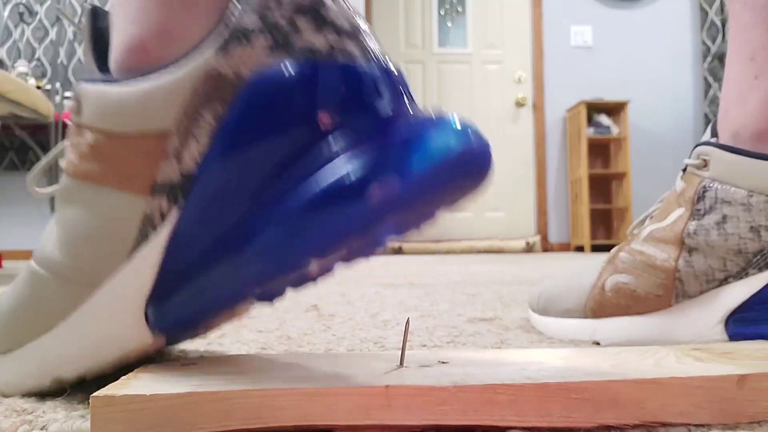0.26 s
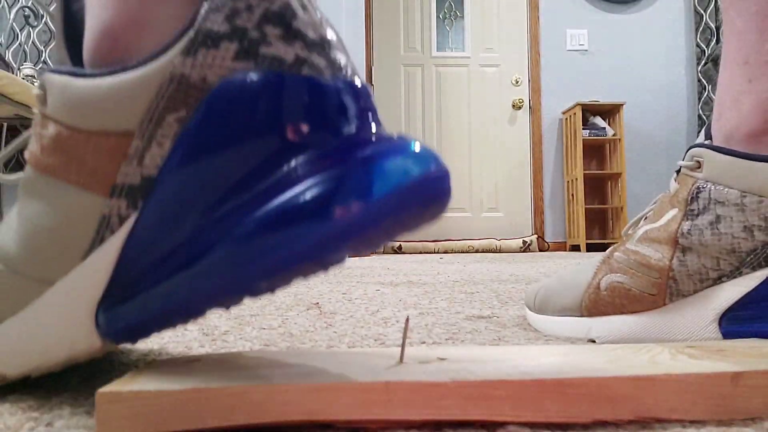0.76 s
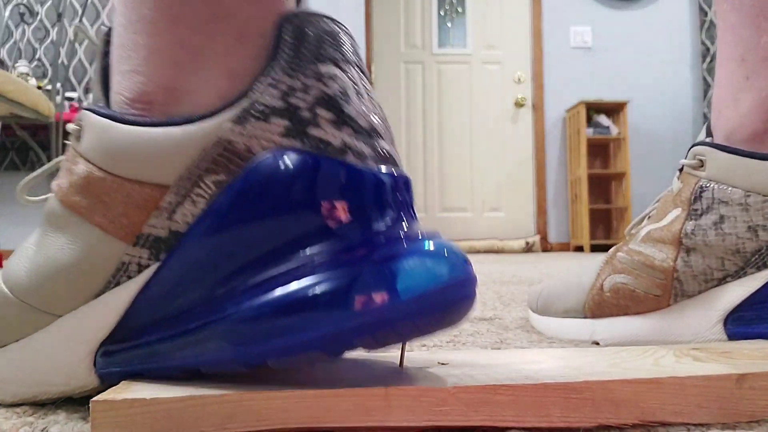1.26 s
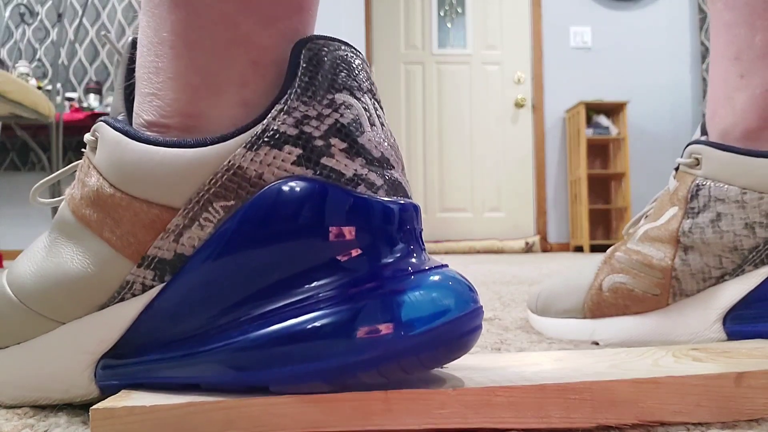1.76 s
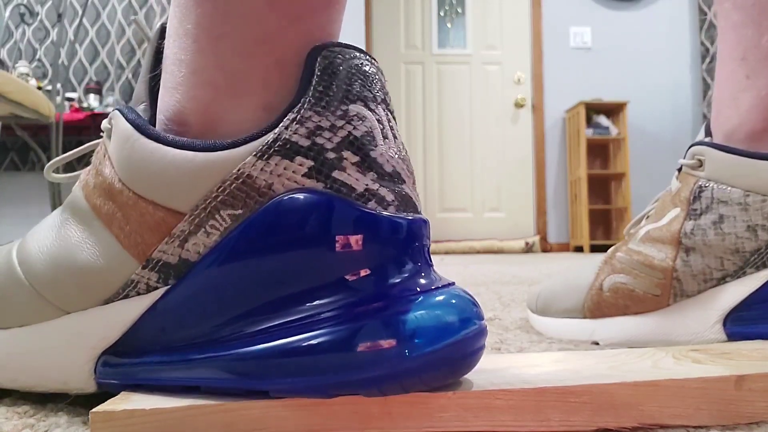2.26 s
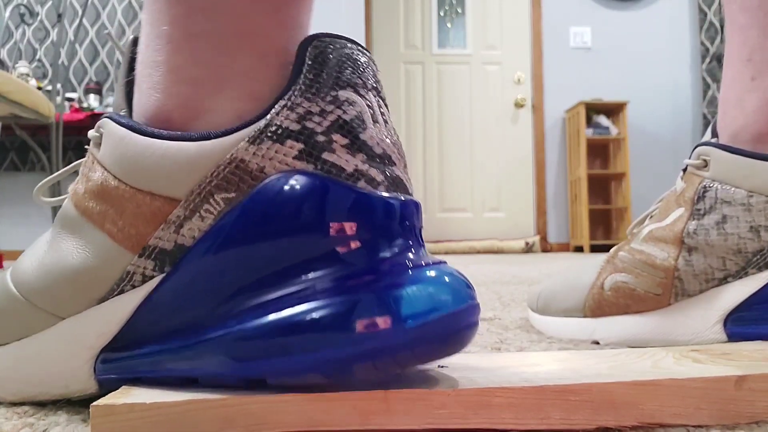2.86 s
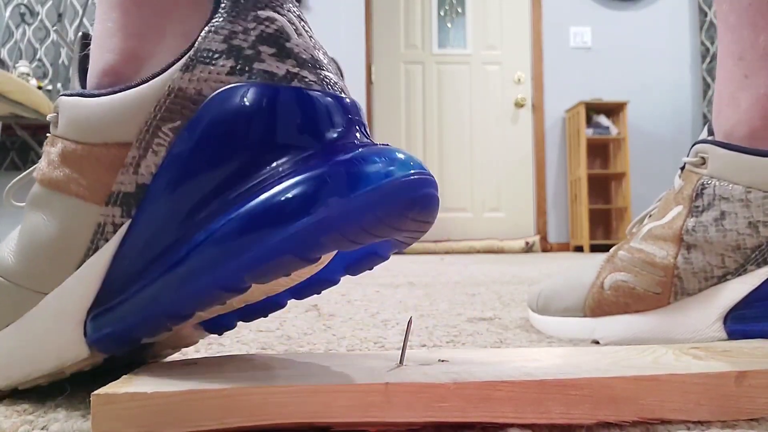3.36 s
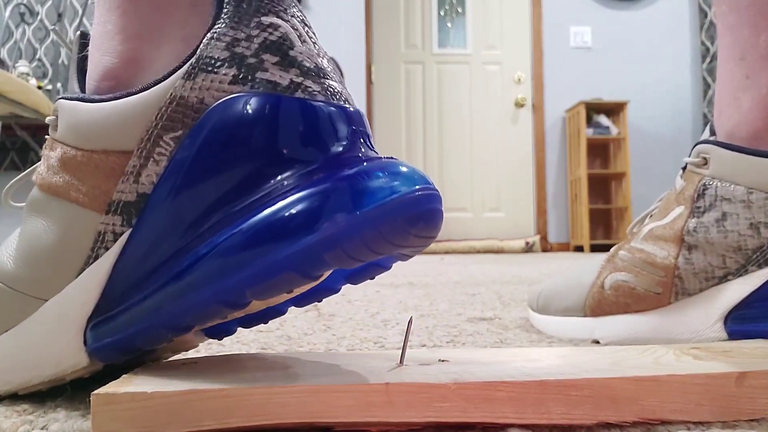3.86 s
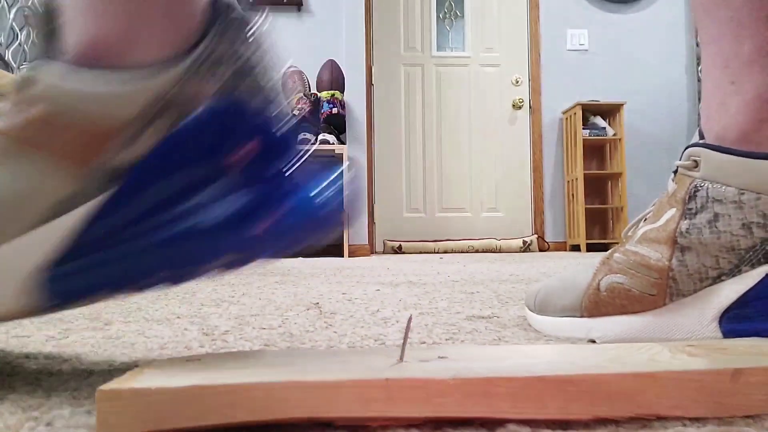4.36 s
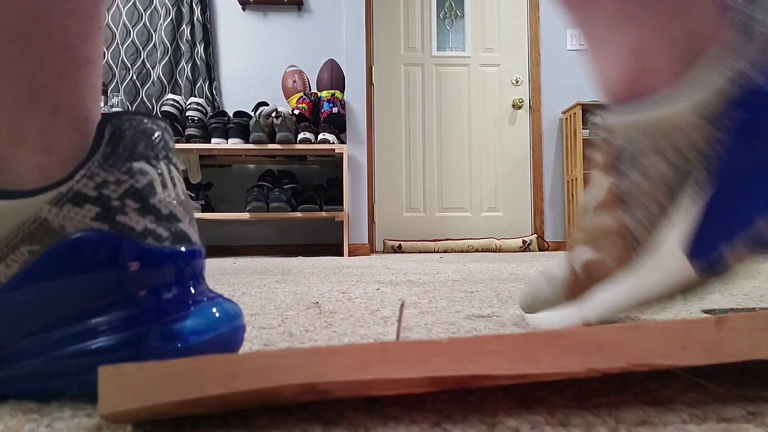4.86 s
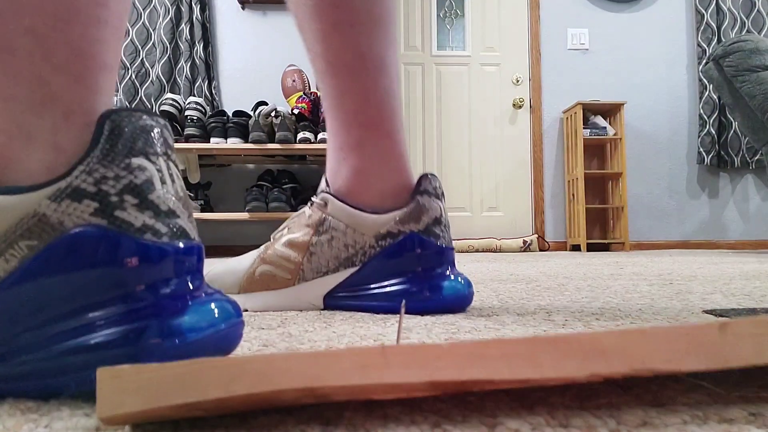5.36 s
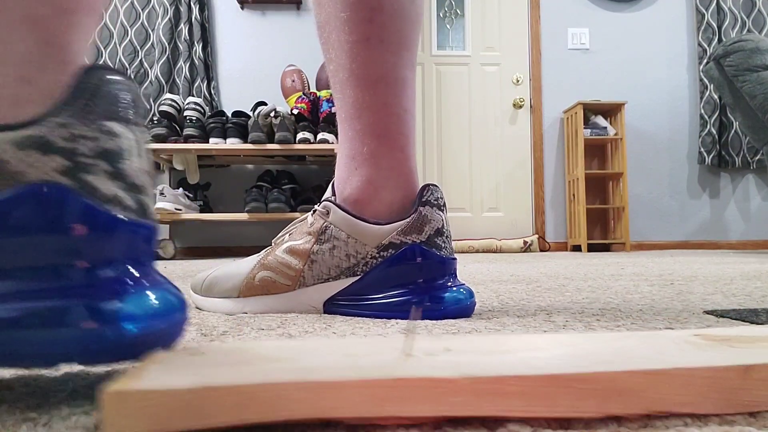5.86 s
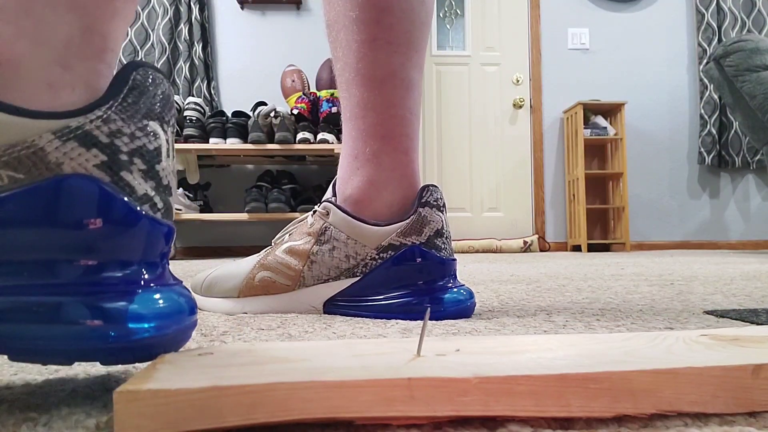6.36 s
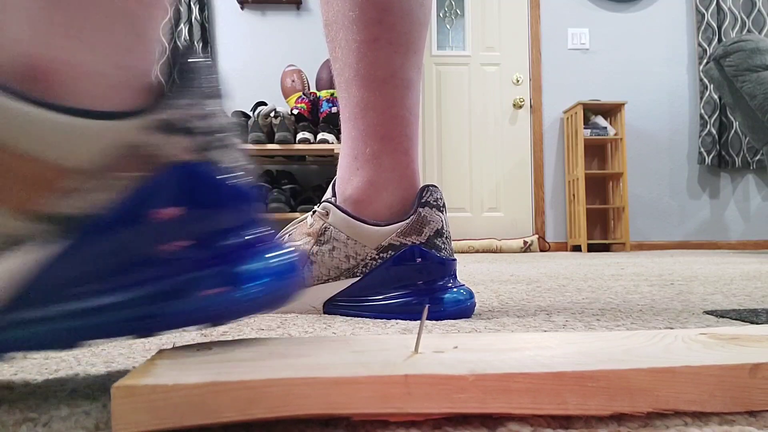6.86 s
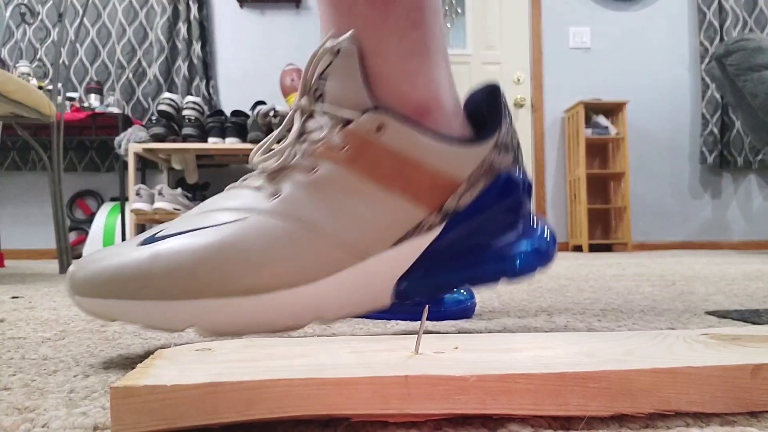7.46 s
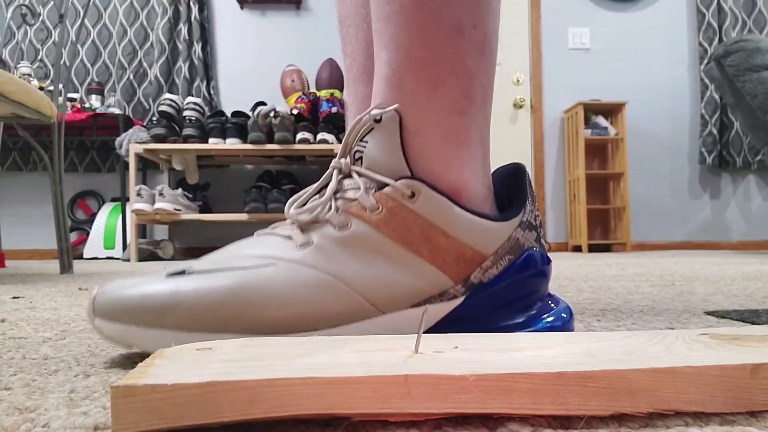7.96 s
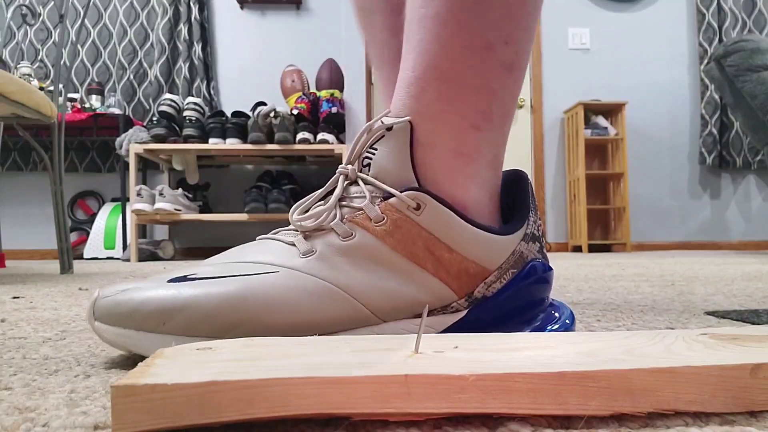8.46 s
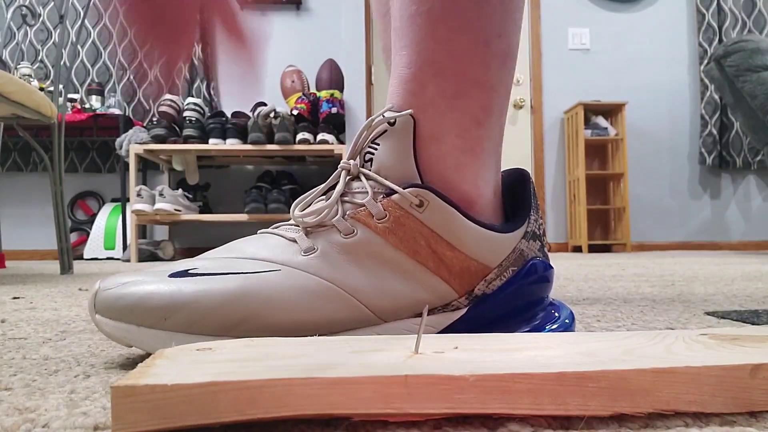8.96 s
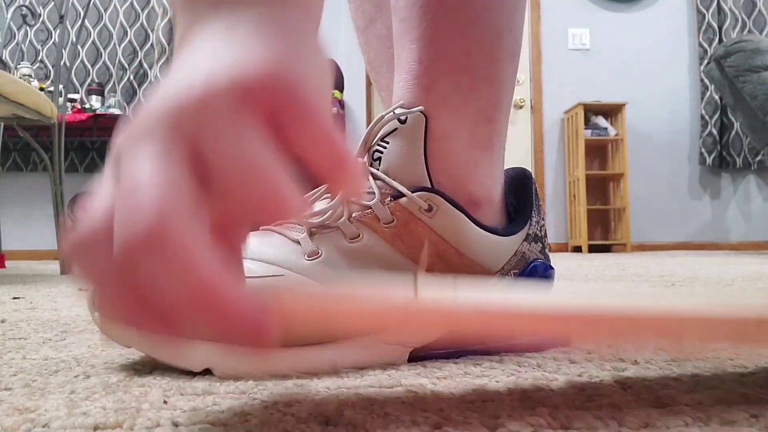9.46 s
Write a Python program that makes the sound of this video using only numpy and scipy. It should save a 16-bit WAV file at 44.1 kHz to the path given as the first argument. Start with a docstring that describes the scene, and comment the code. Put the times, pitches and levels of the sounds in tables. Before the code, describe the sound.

Quiet, dry indoor foley: muffled footfalls and rubbing carpet fibres, mostly to the left. A nail pops into a rubbery cushion with a hollow click, later snaps twice on release, and dull wooden knocks accompany the steps. Near the end one loud, bright wooden knock stands far above the rest, followed by tearing fibre ticks and a dull bump. The short room reflections fade over rumble and soft hiss.

```python
"""Sneakers tread on a nailed wooden board lying on carpet, close to a microphone on the floor of a small room.
The board knocks with damped wood modes; the nail pops into the heel's air cushion and snaps out, as ticks and rings.
Fibres tear off with small ticks, shoes thud as slow low modes, scuff as crackling grains and squeak as hissy noise.
At last a hand knocks the board and drags it off the carpet. The room answers with decaying noise; behind it all
lie lumpy floor rumble, a faint steady hiss and a high hiss that swells before and around the hits."""
import sys
import numpy as np
from scipy import signal
from scipy.fft import rfft, irfft
from scipy.io import wavfile
from scipy.ndimage import uniform_filter1d

SR = 44100
rng = np.random.default_rng(int(sys.argv[2]) if len(sys.argv) > 2 else 0)


def bounce(signal):
    """Save signal as a 16-bit WAV file at the path given by the first command-line argument."""
    frames = np.transpose(np.atleast_2d(signal))
    limited = np.clip(frames, -1, 1)
    pcm = np.round(limited * 32767).astype(np.int16)
    wavfile.write(sys.argv[1], SR, pcm)


N = 428652

# Event levels below are set ahead of panning, microphone ports and room.
# Wooden knocks. Each row: start in seconds, peak in dB, contact hardness in Hz, left over right in dB.
KNOCKS = [(2.185, -28, 300, 6.5), (3.1035, -32, 983, 5.5), (4.369, -45.5, 698, 10), (4.728, -29, 382, 10.5),
          (4.857, -32, 503, 6), (5.2228, -34.5, 624, -0.5), (5.458, -43.5, 800, 9.5),
          (5.491, -41.5, 714, 13), (5.5736, -28.5, 630, -2.5), (5.598, -27, 400, -1),
          (5.684, -35.5, 852, 13), (5.8924, -32, 634, 4.5), (5.9901, -37, 625, -2.5),
          (8.0403, -28, 616, 6.5), (8.736, -32.5, 594, -1.5), (8.9505, -34.5, 656, 2),
          (9.163, -34, 730, -2), (9.2013, -5, 1550, 8.5), (9.466, -37, 900, 3), (9.4753, -25.5, 624, 3),
          (9.614, -44.5, 860, -5)]
# Modes of the board on carpet. Each row: pitch in Hz, relative level in dB, time to fall 60 dB in seconds.
BOARD_MODES = [(182.1, -19, 0.047), (301, -21, 0.063), (454.3, -23.5, 0.025), (652, -14.5, 0.025),
               (960, -25, 0.0097), (1630, -7, 0.0098), (2512, -21.5, 0.013)]
# Snaps of nail, rubber and wood. Each row: start in seconds, ring peak in dB, ring pitch in Hz,
# ring time to fall 60 dB in seconds, relative overtones in dB, tick peak in dB, extra send to the room in dB.
SNAPS = [(0.3161, -46, 1620, 0.0017, -12.5, -43.5, 9), (0.4941, -48.5, 1040, .009, -10.5, -66, 0),
         (2.1805, -11.5, 952, .009, 1, -15.5, 1.5), (3.0602, -44, 818, 0.0092, -8, -49, 5),
         (3.1029, -29, 1580, 0.0057, -13, -24, 0), (4.6172, -48, 1950, .006, -22, -72, 9),
         (4.8565, -22.5, 1635, .013, 5.5, -11, -0.5), (6.3306, -54, 937, 0.03, 3, -44, 10.5),
         (6.367, -58, 930, .01, -1, -69, 6), (6.409, -62, 1004, .01, 6, -71, 4),
         (6.7888, -51, 1040, 0.022, -9, -41, 10.5), (8.834, -59, 3417, 0.0033, -25, -72.5, 7.5),
         (9.2019, -15.5, 2400, 0.0031, -16, -18, -2), (9.2018, -16, 1136, 0.0062, -11, -24, 2.5)]
# What a snap rings with. Each row: multiple of its ring pitch, relative level in dB, share of its ring time.
SNAP_MODES = [(1, 3.5, 1), (1.42, -4, 0.96), (1.89, -2, 1), (3.08, -17, .7)]
# Noisy crack of a snap. Each row: multiple of its ring pitch, relative level in dB per Hz.
CRACK_SPECTRUM = [(.1, -14), (.4, 1), (1, -2.5), (1.6, -7.5), (3.503, -14), (7.997, -27.5)]
# Tearing tick of a snap. Each row: frequency in Hz, relative level in dB per Hz.
SNAP_TICK_SPECTRUM = [(500, -27.5), (1200, -24), (3200, 1), (4200, -14.5), (5500, -6.5), (7500, -12.5),
                      (9500, -2.5), (12500, -1), (15000, 2)]
PUSH_PITCH, PUSH_DB = .215, -13.5  # low push of a snap: share of the ring pitch, level against the ring
# Carpet fibres snag on rough wood and tear free. Each row: start in seconds, tick peak in dB, left over right in dB.
SNAGS = [(3.075, -30, 8), (4.846, -31, 6), (5.5425, -44, 8), (5.586, -25.5, 5), (5.598, -27, 10),
         (5.6111, -27, -3), (5.6308, -42, 3.5), (9.3249, -37, -1), (9.4601, -35, 5), (9.466, -35, -14),
         (9.4763, -20, 4), (9.4822, -13.5, -3), (9.493, -15.5, 7), (9.5143, -16, -3)]
# Tearing tick of a snag. Each row: frequency in Hz, relative level in dB per Hz.
SNAG_TICK_SPECTRUM = [(500, -18), (2000, -3), (4000, -8), (6000, -7.5), (8000, -9.5), (11000, -5),
                      (13000, 5), (15000, 5)]
# Each snag plucks the board faintly: the ring level is against the tick.
SNAG_HZ, SNAG_T60_S, SNAG_RING_DB, SNAG_OVERTONES_DB = 780, 0.0058, -14, -15.5
# Soft footfalls that shake the floor. Each row: start in seconds, peak in dB, pitch in Hz, left over right in dB.
THUDS = [(0.364, -49, 68, 0), (0.472, -38, 110.4, 10), (0.492, -31.5, 79.6, 12), (1.025, -44, 135, 3),
         (1.362, -53, 116, 8), (2.188, -28.5, 158.6, 8), (2.19, -40.5, 72.8, -1.5), (3.09, -41, 102, 4.5),
         (4.373, -43, 79.65, 7.5), (4.726, -33, 116, 4), (5.333, -49.5, 69.8, 0), (5.58, -25.5, 82.5, -8),
         (5.677, -40, 63, -2.5), (5.927, -36, 71, 0), (6.807, -41, 61.9, -2), (6.812, -44.5, 116.6, 2.5),
         (8.04, -45.5, 82.5, -2), (9.204, -29.5, 76, -2), (9.477, -35.5, 88, -1)]
THUD_CYCLES = 8.5  # swings of the floor until 60 dB down
# Rubbing on carpet, and the room's short rough answer to the loud pop. Each row: time of the top in seconds,
# length in seconds, body level in dB, rasp level in dB, fizz level in dB.
SCUFFS = [(.49, 0.048, -60, -81, -90), (2.212, 0.027, -52.5, -51, -62.5), (2.247, 0.051, -56.5, -68.5, -71),
          (3.13, 0.043, -65, -64.5, -71), (4.364, 0.046, -60, -73, -80), (4.671, 0.13, -65, -79.5, -89.5),
          (4.855, 0.1, -52.5, -67, -65.5), (5.038, 0.026, -64.5, -83, -90), (5.602, 0.041, -46, -57, -52.5),
          (5.684, 0.038, -56, -71.5, -72), (5.968, 0.038, -49.5, -59, -58),
          (6.323, 0.088, -68.5, -76, -70.5), (6.8, 0.045, -56.5, -64, -71.5), (7.523, 0.047, -99, -87, -73),
          (8.064, 0.07, -61.5, -92, -73.5), (9.006, 0.071, -70.5, -85, -77),
          (9.339, 0.068, -58, -60.5, -63.5), (9.4, 0.013, -60, -58, -80), (9.487, 0.032, -36.5, -51.5, -52),
          (9.542, .12, -62.5, -67.5, -69.5)]
# Low, middle and high layer of a scuff. Each row: frequency in Hz, relative level in dB per Hz.
BODY_SPECTRUM = [(80, -11.5), (220, -1.5), (600, -8), (1100, -17), (1800, -21.5), (4000, -61.5)]
RASP_SPECTRUM = [(500, -28), (1200, 0.5), (2000, 5.5), (3100, 6), (4500, -1.5), (7000, -32), (12000, -37)]
FIZZ_SPECTRUM = [(2500, -33), (5500, -3.5), (7500, -7.5), (10000, -1), (13000, 1), (15000, -8)]
SQUEAK_S, SQUEAK_LENGTH_S, SQUEAK_DB = 7.526, 0.042, -74  # time of the top, length, level
# Sole against shoe. Each row: frequency in Hz, relative level in dB per Hz.
SQUEAK_SPECTRUM = [(3500, -40), (5200, -8), (5900, 0), (6600, -6), (8000, -35)]
# The right microphone port against the left. Each row: frequency in Hz, lag in radians, level in dB.
PORTS = [(60, .1, 1), (250, 0.2, 4), (590, 0.55, 1.5), (990, 0.84, -3.5), (2325, 1.6, -1.5),
         (5000, 1.5, -1), (14000, 1.2, -3)]
# The room. Each row: frequency in Hz, time to fall 60 dB in seconds, level in dB.
ROOM = [(70, 0.67, -8.5), (197.2, .29, -7.5), (606, .16, -13.5), (1510, .2, -20.5), (3000, .23, -11),
        (7000, .26, -10.5), (13140, .2, -19)]
# Likeness of the two channels in diffuse sound. Each row: frequency in Hz, likeness from 0 to 1.
LIKENESS = [(50, 0.92), (250, 0.7), (700, 0), (2000, 0), (15000, 0)]
# The weight shifts and the floor rumbles. Each row: time of the top in seconds, length in seconds,
# level in dB before the lumps lift the bass.
SHIFTS = [(0.504, 0.18, -55), (1.012, 0.26, -63), (1.76, 0.23, -61.5), (2.3, 0.24, -64),
          (3.079, 0.21, -56.5), (4.319, 0.27, -61), (4.83, 0.23, -54.5), (5.55, 0.48, -57),
          (6.818, 0.28, -60.5), (7.35, .12, -68), (8.1, 0.39, -57), (8.75, .16, -58.5),
          (9.397, 0.48, -64.5)]
# Floor rumble. Each row: frequency in Hz, relative level in dB per Hz.
RUMBLE_SPECTRUM = [(13, -39.5), (22, -20), (38, -8.5), (60, 0), (96, -14), (127, -9.5), (144, -16),
                   (243, -12), (298, -22), (339, -20.5), (376, -24.5), (404, -28), (597, -32.5),
                   (700, -40.5), (910, -61.5), (1540, -120)]
# Trim of the steady rumble bed. Each row: frequency in Hz, gain in dB.
REST_TRIM = [(30, -2.5), (80, -2), (140, -0.5), (250, -1.5)]
# High hiss that swells before and around the hits. Each row: start in seconds, length in seconds, level in dB.
HISS_SWELLS = [(0.37, 0.2, -77), (.82, 0.91, -86), (1.866, 0.29, -76), (2.8, 0.15, -78),
               (3.05, 0.33, -81.5), (4.324, 0.13, -73.5), (4.642, 0.42, -75.5), (5.496, 0.26, -78.5),
               (8.017, 0.097, -71.5), (9.1, 0.6, -74.5)]
SWELL_RISE_S, SWELL_FALL_S = 0.046, .035  # time constants
# Swelling hiss. Each row: frequency in Hz, relative level in dB per Hz.
SWELL_SPECTRUM = [(300, -20.5), (1000, -7), (3500, -12.5), (7500, -18.5), (11000, -4.5), (14500, -0.5),
                  (16000, -21)]
# Steady hiss. Each row: frequency in Hz, relative level in dB per Hz.
HISS_SPECTRUM = [(290, -28), (500, -6), (592, -7), (786, -3), (843, -5), (1220, -8), (1680, -8),
                 (2200, -11.5), (2400, -10), (3460, -11), (7840, -19), (14000, -11), (14600, -18.5)]
HISS_DB = -81
EDGE_HZ = 14900  # top of the sound band


def knocks(slap_db=0, slap_hz=420, slap_decay_s=0.00054, mode_lag=0.29, slope=3.3):
    """The board is pushed down and springs back: a short pressure dip, then its damped modes."""
    out = np.zeros((2, N))
    t = np.arange(SR // 4) / SR
    f = np.fft.rfftfreq(len(t), 1 / SR)
    lead = SR // 200  # samples of space ahead of the blow
    slap = amp(slap_db) * np.cos(2 * np.pi * slap_hz * t) * np.exp(-t / slap_decay_s)
    lag = np.array([[0], [mode_lag]])  # radians: each port faces another part of the bending board
    wood = slap + sum(amp(db) * ring(t, hz, t60, lag) for hz, db, t60 in BOARD_MODES)
    wood_spectrum = rfft(np.roll(wood, lead, axis=1))
    for s, db, hard_hz, pan_db in KNOCKS:
        softness = 1 + (f / hard_hz) ** slope  # a soft contact takes away the treble
        blow = irfft(wood_spectrum / softness, len(t))
        add(out, s - lead / SR, panned(-amp(db) * peaked(blow), pan_db))
    return out


def snaps(pan_db=5):
    """Nail, rubber and wood slip against each other; returns the microphone's share and the room's share."""
    near, thrown = np.zeros((2, 2, N))
    for s, *snap, room_db in SNAPS:
        start, sound = slip(SNAP_TICK_SPECTRUM, *snap)
        sound = panned(sound, pan_db)
        add(near, s + start, sound)
        add(thrown, s + start, amp(room_db) * sound)
    return near, thrown


def slip(tick_spectrum, ring_db, ring_hz, t60, overtones_db, tick_db, tick_decay_s=.0008,
         rattle_db=-21, rattle_decay_s=.0087, tear_rise_s=.0006,
         crack_db=-17, push_cycles=5, ring_rise_s=0.00038):
    """A sudden slip: tearing tick, brief hollow crack, low push through sole and board; returns (start s, sound)."""
    t = np.arange(-SR // 200, SR // 8) / SR
    after, before = np.maximum(t, 0), np.minimum(t, 0)
    fall = np.exp(-after / tick_decay_s) + amp(rattle_db) * np.exp(-after / rattle_decay_s)
    tear = np.exp(before / tear_rise_s) * fall
    burst = rng.standard_normal((3, len(t))) * tear
    burst = burst[0] + .5 * burst[1:]  # mostly shared by both channels
    tick = peaked(colour(burst, tick_spectrum))
    crack = peaked(colour(burst, [(ring_hz * k, db) for k, db in CRACK_SPECTRUM]))
    lowest, *upper = [amp(db) * ring(after, ring_hz * k, t60 * share) for k, db, share in SNAP_MODES]
    modes = lowest + amp(overtones_db) * sum(upper)
    hollow = peaked(modes * (1 - np.exp(-after / ring_rise_s)))
    push_hz = PUSH_PITCH * ring_hz
    push = peaked(ring(after, push_hz, push_cycles / push_hz) * (1 - np.exp(-after * push_hz)))
    ringing = hollow + amp(crack_db) * crack - amp(PUSH_DB) * push
    return t[0], amp(tick_db) * tick + amp(ring_db) * ringing


def snags():
    """Fibres tear off the moving board: small slips with the same settings, mostly tick."""
    out = np.zeros((2, N))
    for s, db, pan_db in SNAGS:
        start, sound = slip(SNAG_TICK_SPECTRUM, db + SNAG_RING_DB, SNAG_HZ, SNAG_T60_S, SNAG_OVERTONES_DB, db)
        add(out, s + start, panned(sound, pan_db))
    return out


def thuds(rise_s=0.006, upper_db=-12, mode_lag=0.3):
    """A cushioned step loads the floor slowly, so only its two lowest modes sound."""
    out = np.zeros((2, N))
    t = np.arange(SR // 2) / SR
    lag = np.array([[0], [mode_lag]])  # radians, left and right
    for s, db, hz, pan_db in THUDS:
        t60 = THUD_CYCLES / hz
        modes = ring(t, hz, t60, lag) + amp(upper_db) * ring(t, hz * 2, t60 * 0.77, lag)
        boom = modes * (1 - np.exp(-t / rise_s))
        add(out, s, panned(amp(db) * peaked(boom), pan_db))
    return out


def scuffs(grain_db=3.0, grains_per_s=2500, pan_db=5, apart=0.94):
    """Rubbed carpet fibres catch and let go in a fine crackle; the room's rough answer to the pop is made alike."""
    t, out = np.arange(N) / SR, np.zeros((2, N))
    sizes = amp(grain_db * np.minimum(rng.exponential(1, (3, N)), 4))
    signs = rng.choice([-1, 1], (3, N))
    grains = sizes * signs * (rng.random((3, N)) < grains_per_s / SR)
    grip = amp(2.5 * evened(uniform_filter1d(rng.standard_normal(N), size=400)))  # wavers by 2.5 dB rms
    grains = grip * (grains[0] + apart * grains[1:])  # one shared layer, one of its own per channel
    strokes = [stroke(t, s, length) for s, length, *_ in SCUFFS]
    layers_db = np.transpose(SCUFFS)[2:]
    for spectrum, levels_db in zip((BODY_SPECTRUM, RASP_SPECTRUM, FIZZ_SPECTRUM), layers_db):
        out += evened(colour(grains, spectrum)) * (amp(levels_db) @ strokes)
    return panned(out, pan_db)


def stroke(t, s, length):
    """A swell that rises quickly to its top and dies away more slowly."""
    u = np.clip(2 * (t - s) / length, -12, 20)
    return np.exp(-abs(u) ** np.where(u < 0, 2, 1.5) / 2)


def squeak(pan_db=4):
    """A sole brushes past the other shoe with a short, hissy squeak."""
    rub = evened(colour(rng.standard_normal((2, N)), SQUEAK_SPECTRUM))
    swell = stroke(np.arange(N) / SR, SQUEAK_S, SQUEAK_LENGTH_S)
    return panned(amp(SQUEAK_DB) * rub * swell, pan_db)


def ports(pair):
    """The shoes are on the left: their sound reaches the right port later, though with a little more bass."""
    hz, rows = np.fft.rfftfreq(N, 1 / SR), np.array(PORTS)
    lag, level_db = read(rows[:, :2], hz), read(rows[:, ::2], hz)
    right = rfft(pair[1]) * np.exp(-1j * lag) * amp(level_db)
    return np.array([pair[0], irfft(right, N)])


def room(x, onset_s=.006):
    """Scattered reflections of a small carpeted room, each band dying at its own speed."""
    hz, t, z = signal.stft(diffuse(rng.standard_normal((2, SR // 2))), SR, nperseg=256)
    rows = np.array(ROOM)
    t60, level_db = read(rows[:, :2], hz)[:, None], read(rows[:, ::2], hz)[:, None]
    fade = np.exp(-np.log(1000) * t / t60) * (1 - np.exp(-(t / onset_s) ** 2))
    fade /= np.sqrt((fade ** 2).sum(1, keepdims=True) * t[1] * SR)  # equal energy per band before its level
    tail = signal.istft(z * fade * amp(level_db), SR, nperseg=256)[1]
    wet = signal.fftconvolve(x.mean(0)[None], tail, axes=1)[:, :N]
    return panned(wet, pan_db=1.5)


def rumble(rest_db=-65.5, rest_pan_db=-5, shift_pan_db=-1.0, lumpy_db=0.57):
    """Rumble of the floor: a steady low bed, and a lumpy layer swelling whenever the weight shifts."""
    t = np.arange(N) / SR
    noise = evened(colour(diffuse(rng.standard_normal((2, N))), RUMBLE_SPECTRUM))
    lumps = evened(colour(rng.standard_normal(N), [(8, 0), (16, -10), (40, -70)]))
    bass = colour(noise, [(110, 0), (220, -32.0)])
    noise += bass * (amp(lumpy_db * (np.clip(lumps, -2, 2) + 6)) - 1)  # the bass is always lifted, unevenly
    load = np.sqrt(sum((amp(db) * stroke(t, s, length)) ** 2 for s, length, db in SHIFTS))
    bed = evened(colour(diffuse(rng.standard_normal((2, N))), RUMBLE_SPECTRUM))
    rest = colour(bed, REST_TRIM)
    return panned(amp(rest_db) * rest, rest_pan_db) + panned(load * noise, shift_pan_db)


def hiss(pan_db=.5, swell_pan_db=13):
    """A faint steady noise, and over it a high hiss that swells before and around the hits, mostly on the left."""
    t = np.arange(N) / SR
    steady = evened(colour(diffuse(rng.standard_normal((2, N))), HISS_SPECTRUM))
    swell = np.zeros(N)
    for s, length, db in HISS_SWELLS:
        rise = np.minimum(t - s, 0) / SWELL_RISE_S
        fall = np.maximum(t - s - length, 0) / SWELL_FALL_S
        swell += amp(db) * np.exp(rise - fall)
    swelling = swell * evened(colour(rng.standard_normal((2, N)), SWELL_SPECTRUM))
    return panned(amp(HISS_DB) * steady, pan_db) + panned(swelling, swell_pan_db)


def amp(db):
    """Decibels to gain."""
    return 10 ** (np.asarray(db) / 20)


def evened(x):
    """Scales to rms 1."""
    return x / np.sqrt(np.mean(x ** 2) + 1e-20)


def peaked(x):
    """Scales to peak 1."""
    return x / abs(x).max()


def read(points, hz):
    """Joins points by straight lines on a log-frequency axis."""
    f, value = np.transpose(points)
    return np.interp(np.log(hz + 1), np.log(f), value)


def colour(x, spectrum):
    """Filters a sound by a drawn spectrum."""
    size = x.shape[-1]
    return irfft(rfft(x) * amp(read(spectrum, np.fft.rfftfreq(size, 1 / SR))), size)


def diffuse(pair):
    """Makes two unrelated channels alike in the bass, as close microphones hear a room."""
    size = pair.shape[-1]
    same = np.clip(read(LIKENESS, np.fft.rfftfreq(size, 1 / SR)), 0, 1)
    a, b = rfft(pair)
    return irfft(np.array([a, same * a + np.sqrt(1 - same ** 2) * b]), size)


def panned(x, pan_db):
    """Shares a sound between left and right at constant power; positive leans left."""
    gains = amp([[pan_db / 2], [-pan_db / 2]])
    return x * evened(gains)


def add(mix, s, sound):
    """Adds a stereo sound at time s in seconds."""
    part = mix[:, max(round(s * SR), 0):][:, :sound.shape[1]]
    part += sound[:, :part.shape[1]]


def ring(t, hz, t60, lag=0):
    """One dying mode: a sine that falls 60 dB in t60 seconds; lag in radians."""
    return np.sin(2 * np.pi * hz * t - lag) * np.exp(-np.log(1000) * t / max(t60, 1e-3))


def scene(knock_room_db=4):
    """Shoes close by; the knocks sound farther off, with more room."""
    knock = knocks()
    soft = snags() + thuds() + scuffs() + squeak()
    snap, snap_thrown = snaps()
    direct = ports(knock + soft + snap)
    reflected = room(amp(knock_room_db) * knock + soft + snap_thrown)
    return direct + reflected + rumble() + hiss()


def record(dry, low_cut_hz=42):
    """The microphone loses the deepest bass; then a steep low-pass limits the band."""
    dry = signal.sosfilt(signal.butter(2, low_cut_hz, "high", fs=SR, output="sos"), dry)
    low_pass = signal.firwin(255, EDGE_HZ, window=("kaiser", 8), fs=SR)
    return signal.oaconvolve(dry, low_pass[None], "same")


dry = scene()
out = record(dry)
bounce(out)
```